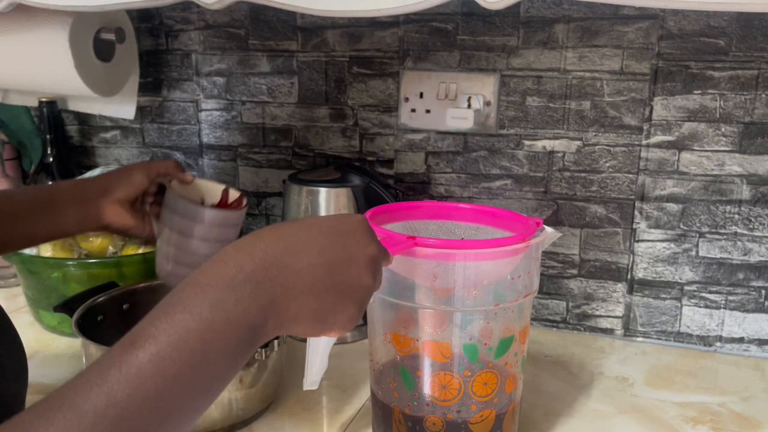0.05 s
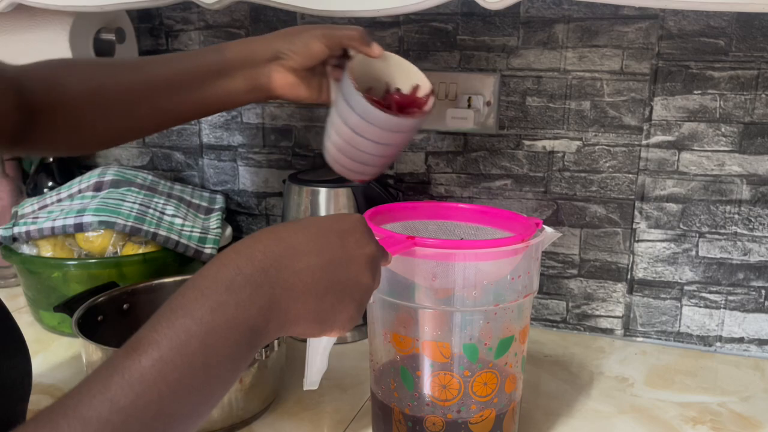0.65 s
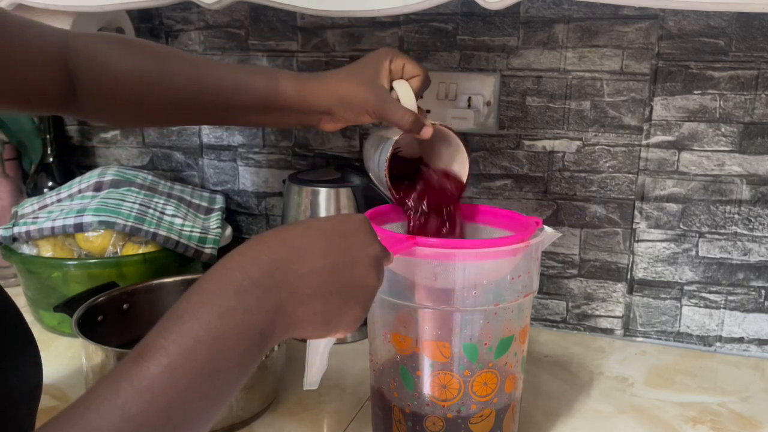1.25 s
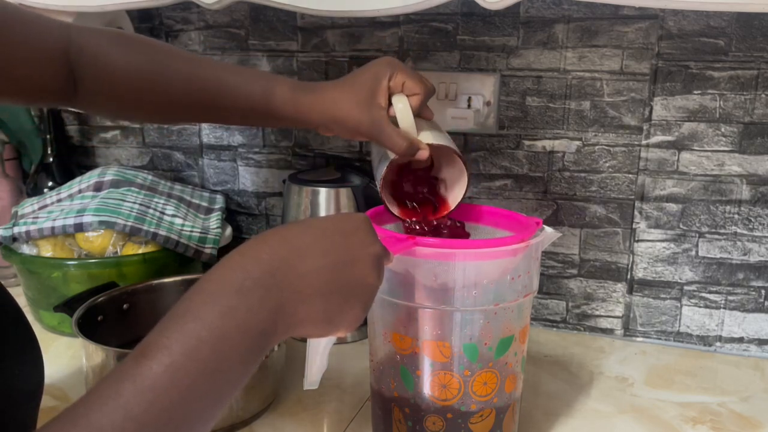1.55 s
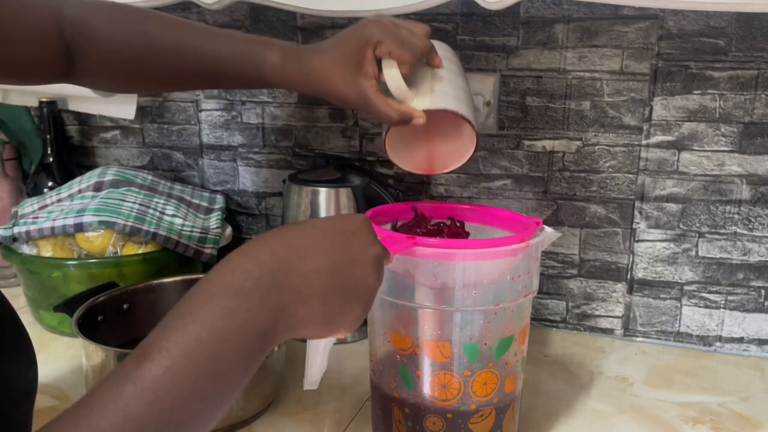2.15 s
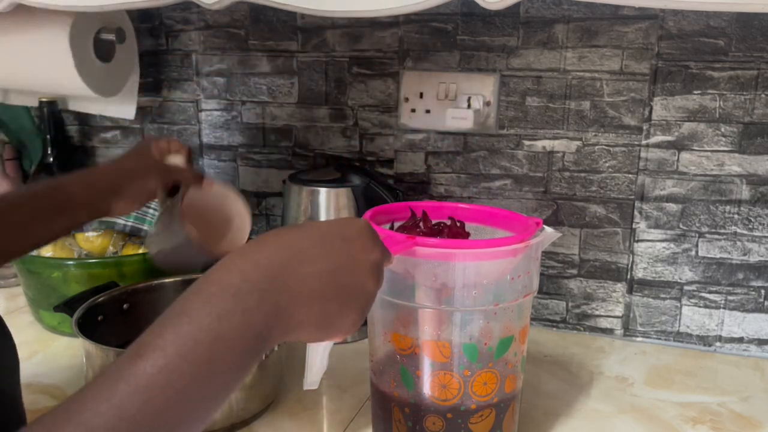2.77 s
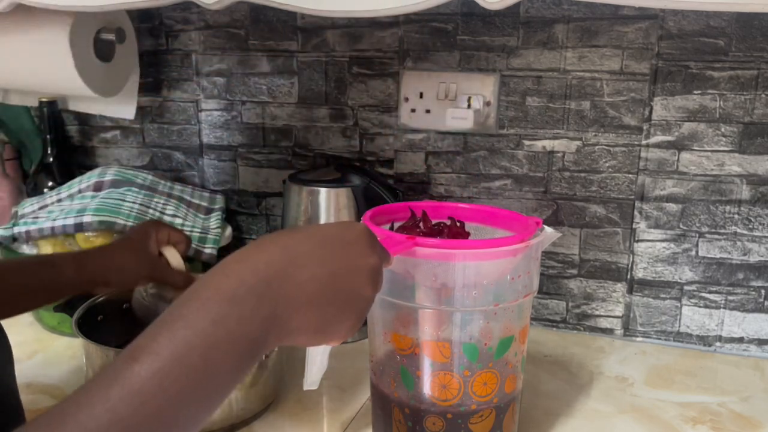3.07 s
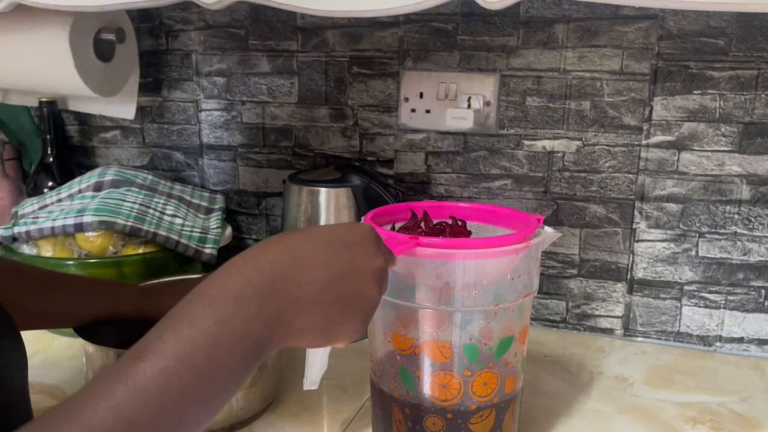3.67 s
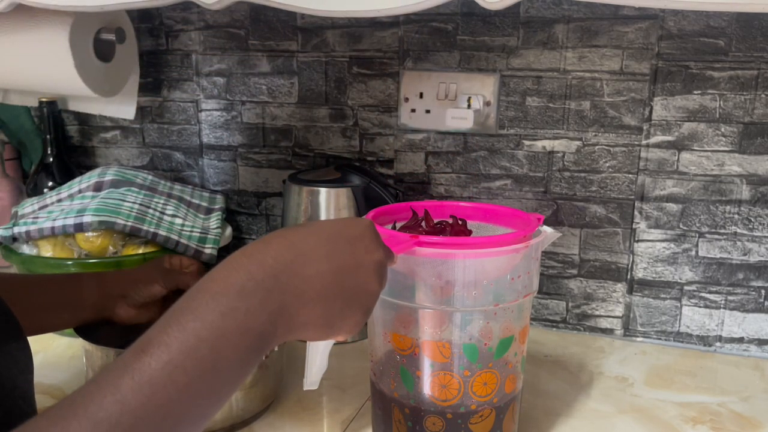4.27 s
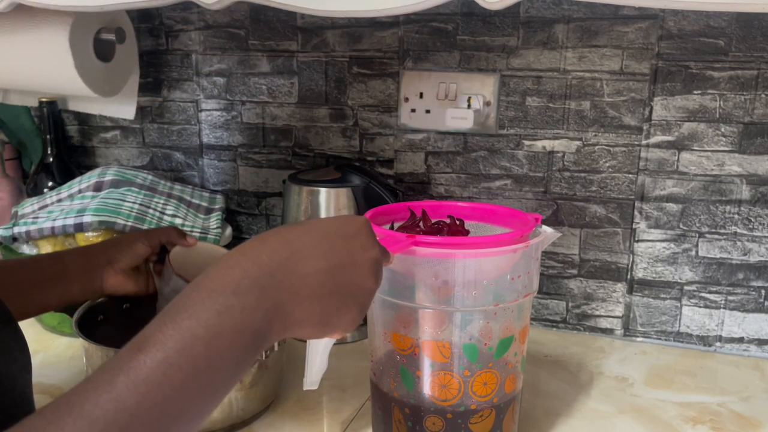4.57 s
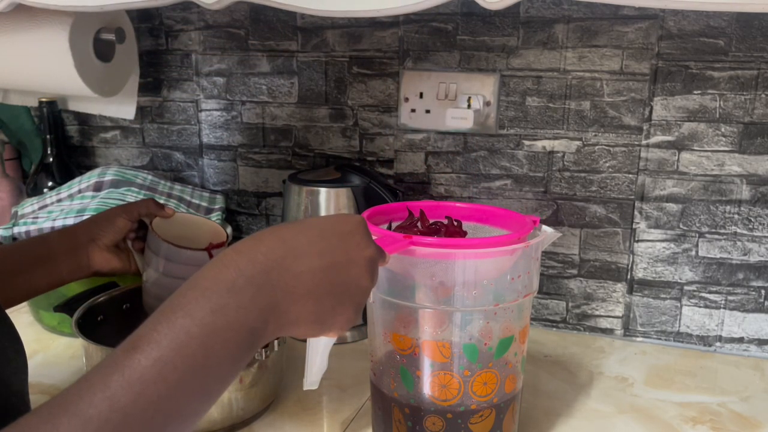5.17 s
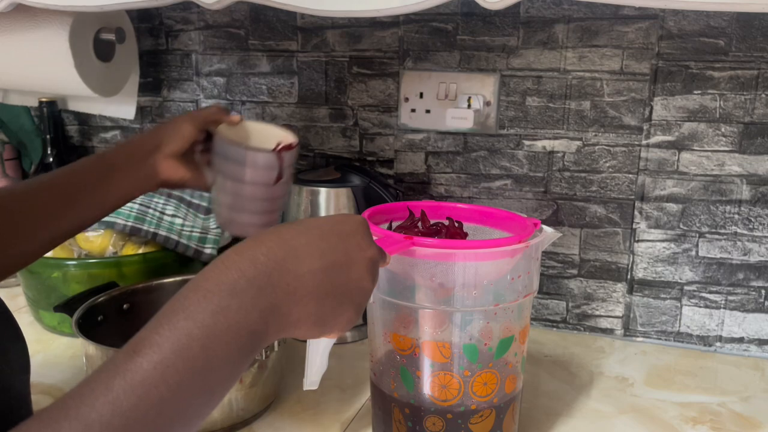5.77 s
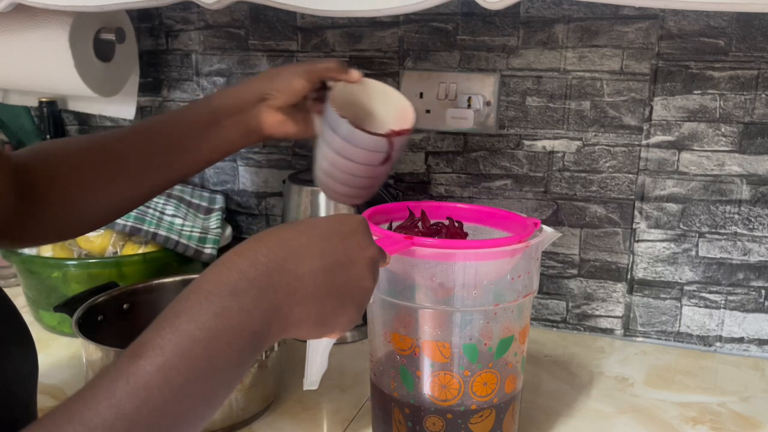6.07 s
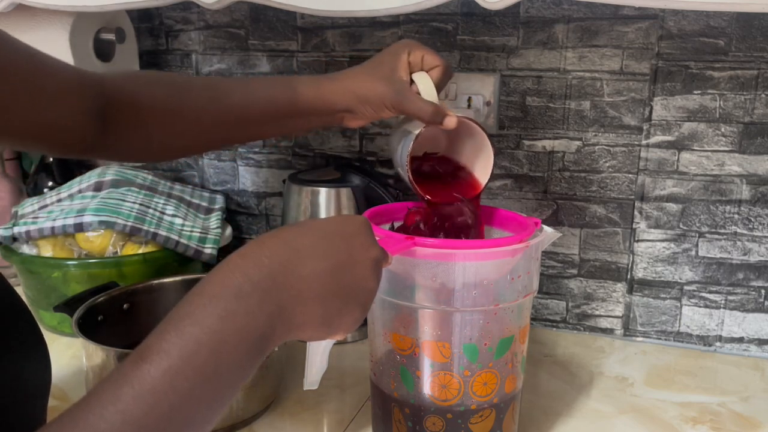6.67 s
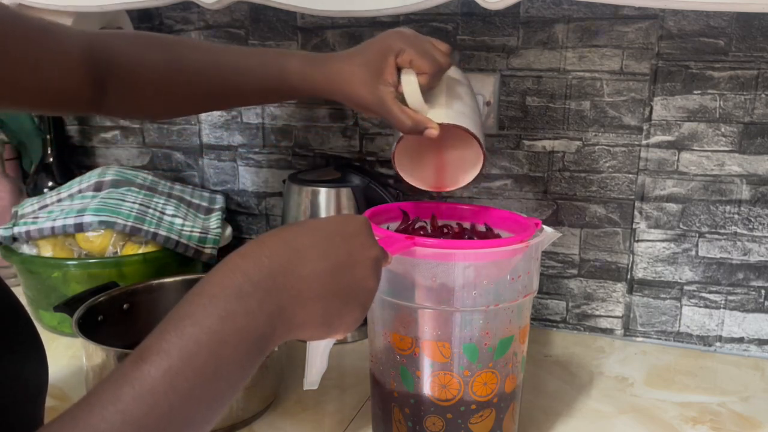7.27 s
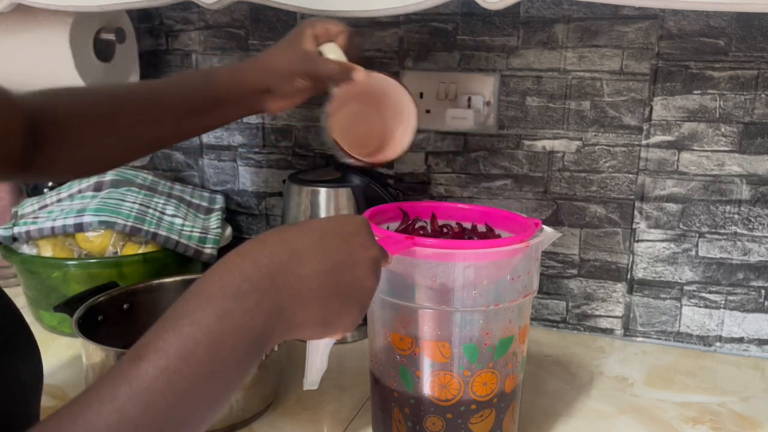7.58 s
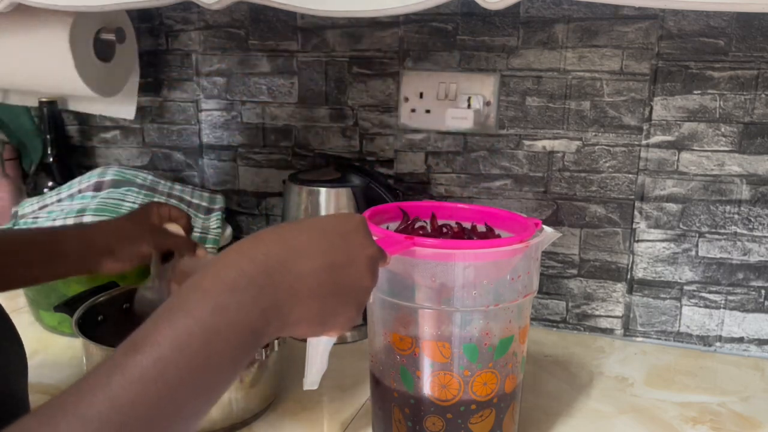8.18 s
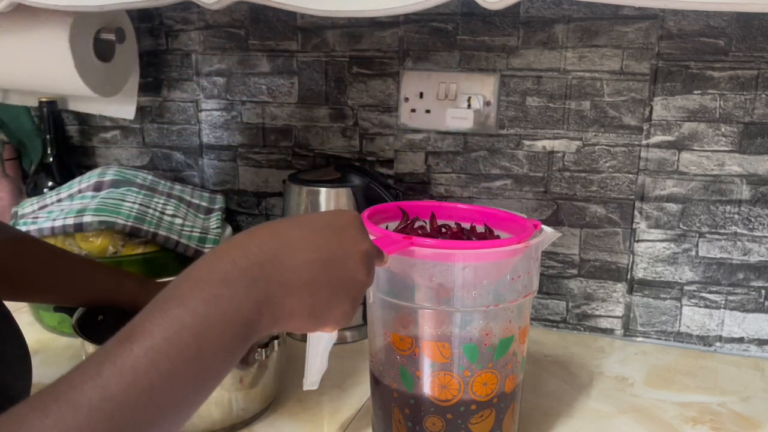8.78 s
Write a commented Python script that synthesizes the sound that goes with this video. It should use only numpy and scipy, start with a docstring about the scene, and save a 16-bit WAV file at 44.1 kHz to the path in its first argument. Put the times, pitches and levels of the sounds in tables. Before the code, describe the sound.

Juice and wet petals pour twice through a strainer into a plastic jug, with a mug knocking in a metal pot between pours.

```python
"""Straining juice in a tiled kitchen.

Two mugs of steeped juice pour through a plastic strainer into a jug. Wet petals plop on the mesh
and wake the air in the jug; the juice splashes, fizzes and bubbles. After each pour the mug knocks
and clatters in the pot as it scoops, and juice drips back off it. A fridge hums behind."""
import sys
import numpy as np
from scipy import signal
from scipy.fft import rfft, irfft, next_fast_len
from scipy.io import wavfile

SR = 44100
rng = np.random.default_rng(int(sys.argv[2]) if len(sys.argv) > 2 else 0)


def output_pcm(signal):
    """Save a mono or channel-first signal as 16-bit PCM at the path in sys.argv[1].

    Samples are clipped to [-1, 1] before scaling.
    """
    pcm = np.clip(np.atleast_2d(signal).T, -1, 1) * 32767
    wavfile.write(sys.argv[1], SR, np.round(pcm).astype(np.int16))


N = 393813
TIME_S = np.arange(N) / SR
RING_S = TIME_S[:SR * 3 // 4]  # time axis of one event

# Levels are ahead of the mix gains; glide is as in bubble().
# fridge, low drone: pitch_hz, level_db
FRIDGE_DRONE = [(42, -71), (49.4, -62), (84, -70), (126, -61.5), (137.5, -66)]
# fridge, faint upper lines: pitch_hz, level_db
FRIDGE_HUM = [(100, -102), (168, -76), (300, -72.5), (336, -74.5), (395.5, -71), (603, -72.5), (1583, -72),
              (3166, -88)]
# fridge hiss: freq_hz, gain_db
HISS_SPECTRUM = [(4000, -9), (7000, -4), (7900, 12.5), (8500, 6), (10000, 8.5), (11000, 9), (12000, -58)]
# room air: freq_hz, gain_db
AIR_SPECTRUM = [(25, -48), (50, -2), (100, -8), (170, -4.5), (330, -8), (700, -8.5), (1050, -14),
                (1600, -12), (2100, -18.5), (3000, -26.5), (4000, -32), (5000, -31), (7000, -28.5),
                (12000, -56)]

# surges through the strainer: start_s, rise_s, hold_s, drain_db_per_s, splash_db, fizz_db
SURGES = [(0.857, 0.23, 0.78, 29, -54.5, -54), (1.13, 0.17, 0.045, 179, -47, -65),
          (1.598, .12, 0.086, 130, -72, -93), (6.395, 0.03, 0.021, 13.5, -61, -63),
          (6.586, 0.13, 0.5, 50, -49.5, -53), (7.199, 0.038, 0.51, 23, -61, -69.5)]
# splash in the jug: freq_hz, gain_db
SPLASH_SPECTRUM = [(100, -20), (340, 2.5), (430, 20), (515, 5.5), (595, 1), (680, 2.5), (790, 8.5),
                   (1000, 3), (1350, 6), (2400, 1.5), (4000, -3), (6000, -31), (12000, -41)]
# fizz of the mesh: freq_hz, gain_db
FIZZ_SPECTRUM = [(1500, 7), (3500, 1.5), (5500, 3), (7300, 0.5), (9000, 4.5), (10200, 4), (11300, 7),
                 (13000, -20)]
# drops bursting on rim and mesh: start_s, level_db, centre_hz, body_db
SPATTER_HITS = [(0.935, -36.5, 3800, -9), (1.2084, -42, 2300, -8), (1.412, -35, 5440, -12),
                (1.687, -49, 5230, -6), (1.8972, -38.5, 5160, -9), (2.112, -36, 6300, -29),
                (4.349, -49, 4900, 5), (4.6056, -50, 1900, -6), (5.027, -46, 9000, -37),
                (5.13, -55, 10000, -22), (5.157, -54, 10500, -29), (6.752, -33.5, 9250, -13),
                (7.5397, -44, 4340, 0), (7.8538, -46, 9000, -11)]
# big lumps landing in the strainer: start_s, level_db, pitch_hz, slap_db, t60_s, upper_modes_db
BIG_LUMPS = [(0.937, -34.5, 441, 4, 0.089, -12), (1.008, -34.5, 452, 0.5, 0.058, -15),
             (1.107, -33, 451, -4, 0.045, 1.5), (1.164, -33.5, 466, -12, 0.04, -5),
             (1.293, -42, 435, -4, 0.025, -10), (1.358, -24.5, 432, -8.5, 0.058, -6.5),
             (1.417, -34, 417, -12, 0.047, -6), (1.543, -39.5, 404, -4, 0.1, -10),
             (1.589, -34.5, 412, -9, 0.052, -20), (1.636, -31, 435, -7, 0.053, -6.5),
             (1.686, -32, 466, -11, 0.047, -14), (1.784, -39.5, 427, -2, 0.054, -13),
             (1.858, -39.5, 444, -6.5, 0.046, -8), (1.898, -38.5, 440, -20, 0.052, -4),
             (1.933, -42.5, 445, -22, 0.055, -8), (1.976, -42.5, 440, -18, 0.06, -16),
             (2.109, -45, 466, 1.5, 0.037, -1), (2.161, -31.5, 454, -14, 0.04, -3.5),
             (6.587, -43, 448, -11, 0.056, -11), (6.751, -48, 470, -2, .04, -8),
             (6.786, -48.5, 500, 7, 0.03, -3), (6.856, -27, 455, -10.5, 0.046, -10),
             (6.917, -30.5, 430, -17, 0.065, -14), (6.973, -40, 464, -22, 0.04, -10),
             (7.005, -38, 430, -23, 0.07, -14), (7.072, -29, 434, -12.5, 0.063, -2.5),
             (7.118, -37, 422, -10, 0.055, -13), (7.158, -42, 430, -10, 0.046, -11),
             (7.197, -31.5, 437, -14, 0.059, -2.5), (7.258, -46.5, 430, -13, 0.07, 9),
             (7.295, -37, 453, -10, 0.039, -3), (7.32, -40, 427, -8, 0.062, -3),
             (7.365, -55, 458, -14, 0.09, 15), (7.402, -48.5, 443, -3, 0.044, 9),
             (7.44, -47.5, 441, -17, 0.11, 0), (7.627, -42.5, 430, -1.5, 0.037, 3),
             (7.663, -42, 445, -16, 0.059, -3), (7.715, -48, 450, -6, .05, 4),
             (7.828, -48, 438, -14, 0.12, -8), (7.912, -40, 450, -7.5, 0.066, -2)]
# wet slap of a lump: freq_hz, gain_db
SLAP_SPECTRUM = [(100, -0.5), (300, 3), (750, -3), (1000, 0), (1500, 0.5), (2500, -5.5), (5000, -21),
                 (11000, -65)]
# upper modes of the air in the jug: pitch_hz, level_db, t60_s
JUG_UPPER_MODES = [(590, -2.5, 0.04), (763, -14, 0.052)]
# full strainer thumping the jug: start_s, level_db
STRAINER_THUMPS = [(0.943, -40), (.972, -46)]
# jug wall: pitch_hz, level_db, t60_s
JUG_WALL_MODES = [(68.4, -6.5, 0.21), (128, -1, 0.075), (178, -2.5, 0.099), (282, -1, 0.061),
                  (334, -10, 0.13)]
# largest bubbles in the jug: start_s, level_db, pitch_hz, glide
BIG_BUBBLES = [(1.146, -33, 2450, 0.083), (1.166, -33, 2750, 0.14), (1.2075, -21.5, 2390, .01),
               (1.211, -31, 1840, 0.041), (1.284, -29, 2350, .02), (1.315, -26.5, 2280, 0.027),
               (1.321, -27.5, 3220, .01), (1.336, -29, 2100, 0.023), (1.341, -29, 1214, 0.039),
               (1.349, -35.5, 957, 0.03), (1.36, -25.5, 1320, 0.007), (1.361, -28, 1720, 0.022),
               (1.506, -31.5, 3140, 0.056), (1.753, -31.5, 3200, 0.032), (1.853, -32, 2600, 0.018),
               (1.86, -33.5, 818, 0.0083), (1.874, -40, 2330, 0.022), (1.898, -34, 3250, .02),
               (1.97, -35, 3300, .04), (2.104, -39, 3460, 0.016), (2.162, -32.5, 853, 0.019),
               (2.168, -42, 2080, 0.022), (6.589, -34, 873, .1), (6.602, -40, 4180, 0.0092),
               (6.608, -32.5, 1110, 0.036), (6.75, -31, 2220, .02), (6.766, -31, 2494, 0.018),
               (6.85, -33.5, 830, .01), (6.884, -34.5, 705, 0.018), (6.89, -28, 1490, 0.038),
               (6.901, -30, 3250, 0.026), (6.948, -29.5, 1890, 0.077), (7.007, -34, 737, .01),
               (7.101, -33, 1570, .02), (7.12, -34, 2150, 0.02), (7.226, -33, 2800, .03),
               (7.294, -35, 2250, .02), (7.297, -33, 3300, 0.032), (7.42, -38, 3080, 0.036),
               (7.494, -43.5, 3487, 0.032), (7.568, -34, 2066, 0.022), (7.625, -38, 1150, .03),
               (7.747, -43, 2630, 0.028), (7.835, -39, 3000, .02)]

# juice running off the mug: start_s, length_s, level_db
RUNOFF_SWELLS = [(2.263, 0.96, -56), (3.23, 1.3, -53.5), (5.043, 0.33, -58.5)]
# trickle over the mug: freq_hz, gain_db
TRICKLE_SPECTRUM = [(1400, 3.5), (3000, -1), (7000, -11)]
# largest drops falling into the pot: start_s, level_db, pitch_hz, glide
BIG_DRIPS = [(2.4952, -48.5, 3030, 0.0079), (2.714, -86, 4290, .02), (2.791, -49, 1880, 0.01),
             (2.932, -59, 2900, 0.043), (3.2944, -48, 2900, 0.025), (3.346, -57, 4370, .02),
             (3.361, -53, 2730, .02), (3.487, -46.5, 6850, 0.024), (4.0521, -48.5, 4260, 0.02),
             (4.12, -53, 2030, 0.019), (4.155, -52, 1860, 0.023), (4.213, -52.5, 4700, 0.016),
             (4.232, -51, 3400, 0.017), (4.351, -57, 2880, .02), (4.351, -51, 5500, 0.013),
             (4.466, -36.5, 3395, 0.015), (4.53, -49, 5800, 0.018), (4.6049, -49, 1896, 0.015),
             (4.606, -49.5, 5000, 0.036), (4.6578, -47.5, 6470, 0.022), (4.672, -45, 5900, 0.017),
             (4.7775, -51.5, 3020, 0.015), (5.16, -60, 2960, 0.009), (5.245, -52, 2850, .01),
             (8.124, -50, 3310, 0.032)]
# hollow of the pot: freq_hz, gain_db
HOLLOW_SPECTRUM = [(1200, -30), (1950, 6), (2400, -15), (3000, 4), (3600, -13), (4500, -17), (6200, -8),
                   (9000, -18)]

# mug rattling in the pot: start_s, level_db, body_t60_s, hardness_db
MUG_CLATTERS = [(3.25, -50, 0.13, -28), (3.645, -23.5, 0.19, -4), (3.7225, -30.5, 0.15, 4.5),
                (3.884, -50, 0.36, 6), (8.497, -28, 0.15, 2), (8.544, -28.5, 0.078, -3),
                (8.727, -30, 0.15, 0.5), (8.751, -24.5, 0.2, -6.5), (8.826, -46, 1, 1.5)]
# dull body of the rattle: freq_hz, gain_db
RATTLE_BODY_SPECTRUM = [(50, -26), (80, -10), (110, -6), (180, -2.5), (300, -5), (450, 0), (650, -7),
                        (800, -8), (1050, -15), (1350, -17.5), (1750, -10), (2600, -20.5), (6000, -60)]
# bright edge of the rattle: freq_hz, gain_db
RATTLE_EDGE_SPECTRUM = [(700, -21), (1700, -40), (2700, -1), (3300, 8), (4300, 4), (6500, 1), (9000, -5),
                        (11000, -0.5), (12500, -25)]
# thin pot wall: pitch_hz, level_db, t60_s
POT_WALL_MODES = [(516, -21, 0.15), (582, -1, 0.16), (910, -25, 0.26), (1250, -29, 0.94), (1686, -28, 0.75),
                  (1868, -27, 0.56), (2056, -30, .7), (2250, -7, 0.085), (2440, -26, 0.18),
                  (2810, -28, 0.48), (3050, -9.5, 0.18), (3190, -18, 0.35), (3340, -19, 0.16),
                  (3435, -29, 0.16), (3620, -29, 0.22), (4100, -18, 0.23), (4750, -27, .25)]
# mug foot striking the pot floor: start_s, level_db, pitch_hz, overtones_db
MUG_KNOCKS = [(3.253, -40.5, 473, -31), (3.6462, -5.5, 567, -7), (8.75, -4, 519.4, -2.5),
              (3.728, -20.5, 572, -16), (3.747, -22, 591, -25), (8.774, -24, 500, -6),
              (8.795, -33, 538, 11), (8.826, -31, 542, 5)]
# pot and counter ringing together: pitch_hz, level_db, t60_s
POT_ON_COUNTER_MODES = [(104, -20, 0.15), (175, -20.5, 0.092), (317.6, -14.5, 0.16), (424, -14, 0.041),
                        (476, -2, 0.042), (960, -2.5, 0.026), (1044, -2.5, 0.041), (1802, -14.5, 0.098),
                        (1880, -19, 0.068), (2130, -13, 0.036), (2380, -17.5, 0.046), (4130, -8, 0.014),
                        (4355, -16, 0.025), (5210, -13, 0.027)]
# pot rocking back on the counter: start_s, level_db
POT_THUDS = [(3.732, -27.5), (3.886, -37), (8.501, -31), (8.544, -30)]
# counter: pitch_hz, level_db, t60_s
THUD_MODES = [(151, -3, 0.14), (188, -3.5, 0.21), (231, 2, 0.064), (315, -3, 0.14), (416, -0.5, 0.086)]
# mug sliding down the pot: start_s, length_s, level_db, pitch_hz
MUG_SLIDES = [(3.35, .11, -55, 1245), (3.49, .18, -55, 1378)]
# glaze striking steel: start_s, level_db
GLAZE_TICKS = [(3.646, -47), (3.724, -25), (3.7275, -28), (3.741, -24), (8.501, -48), (8.75, -29)]
# tick of the glaze: freq_hz, gain_db
TICK_SPECTRUM = [(1500, -30), (3300, 15), (6000, -11), (9000, 0), (12500, 9), (16000, -14)]

# kitchen reverberation: freq_hz, t60_s
KITCHEN_DECAY = [(100, 1), (300, 0.4), (700, 0.69), (2000, 0.56), (5000, 0.42), (11000, 0.4)]
# diffuse sound at the two microphone ports: freq_hz, coherence
PORT_COHERENCE = [(60, 0.8), (250, 0.6), (500, 0.37), (600, 0), (5000, 0), (6500, 0.3), (8000, 0),
                  (8400, 1), (12000, 1)]
# phase between the ports: freq_hz, left_lead_rad
PORT_LEAD = [(1800, 0), (3300, .7), (6500, .4), (7000, 2.8), (8500, 0), (9400, -1.7), (10150, -3.14),
             (11000, -4.5), (11800, -6.2)]
# level between the ports: freq_hz, left_minus_right_db
PORT_BALANCE = [(60, 1.2), (300, 1.7), (1000, 1.9), (3000, 1.3), (5300, 4.8), (6800, 3.1), (7700, 1.6),
                (10000, 0.17)]
# microphone response: freq_hz, gain_db
MIC_RESPONSE = [(18, -30), (44, 0.5), (70, 0), (11000, -1.5), (12300, -7), (13300, -46), (14500, -26),
                (16000, -40)]

AIR_DB, HISS_DB, COMPRESSOR_HZ = -57, -67.5, 42
FIZZ_EXPONENT = 1.47  # fizz grows as this power of the flow
DRY_SHARE = .11  # no stray events below this share of peak flow
SMALL_GLIDE = .035
POT_LEAD_S, BAND_LIMIT_HZ = .00012, 16800


def amp(db):
    """Decibels to gain."""
    return 10 ** (np.asarray(db) / 20)


def unit_rms(x):
    """Scale to rms 1."""
    return x / np.sqrt(np.mean(x ** 2) + 1e-20)


def lookup(points, hz):
    """Interpolate a table on a log-frequency axis."""
    freq_hz, value = np.transpose(points)
    return np.interp(np.log(hz + 1), np.log(freq_hz + 1), value)


def add(mix, start_s, sound):
    """Mix a sound in at start_s."""
    part = mix[..., round(start_s * SR):][..., :sound.shape[-1]]
    part += sound[..., :part.shape[-1]]


def colour(x, spectrum, size=4096):
    """Minimum-phase filter from (freq_hz, gain_db) points."""
    log_gain = np.log(amp(lookup(spectrum, abs(np.fft.fftfreq(size, 1 / SR)))))
    taps = np.fft.ifft(np.exp(np.conj(signal.hilbert(log_gain)))).real[:size // 2]
    return np.apply_along_axis(lambda row: signal.oaconvolve(row, taps)[:len(row)], -1, x)


def decay(t60_s):
    """Fall of 60 dB in t60_s."""
    return np.exp(-np.log(1000) * RING_S / t60_s)


def attack(rise_s):
    """Soft onset of about rise_s."""
    return 1 - np.exp(-(RING_S / rise_s) ** 2)


def arch(start_s, length_s):
    """Semicircular swell and ebb."""
    return np.sqrt(np.maximum(1 - (2 * (TIME_S - start_s) / length_s - 1) ** 2, 0))


def wander(rate_hz, count=24):
    """Random drift below rate_hz, rms 1."""
    coarse_s = TIME_S[::128]
    share, phase = rng.random((2, count, 1))
    drift = np.sin(2 * np.pi * (rate_hz * share * coarse_s + phase)).sum(0)
    return np.interp(TIME_S, coarse_s, unit_rms(drift))


def ring(modes, rise_cycles):
    """Struck modes, each building up over rise_cycles."""
    return sum(amp(db) * decay(t60_s) * attack(rise_cycles / hz)
               * np.sin(2 * np.pi * (hz * RING_S + rng.random())) for hz, db, t60_s in modes)


def burst(spectrum, t60_s, rise_s):
    """Decaying puff of coloured noise."""
    return unit_rms(colour(rng.standard_normal(len(RING_S)), spectrum)) * decay(t60_s) * attack(rise_s)


def diffuse(pair):
    """Blend two unrelated channels to the coherence of diffuse sound at the ports."""
    a, b = rfft(pair)
    coherence = np.clip(lookup(PORT_COHERENCE, np.fft.rfftfreq(pair.shape[1], 1 / SR)), 0, 1)
    mid, side = np.sqrt((1 + coherence) / 2) * a, np.sqrt((1 - coherence) / 2) * b
    return irfft([mid + side, mid - side], pair.shape[1])


def fridge():
    """Wavering hum and a hiss pulsing with the compressor, over steady room air."""
    air = amp(AIR_DB) * unit_rms(colour(diffuse(rng.standard_normal((2, N))), AIR_SPECTRUM))
    hum = np.zeros(N)
    for hz, db in FRIDGE_DRONE + FRIDGE_HUM:
        gain = amp(db) * np.sqrt(2) * (1 + .042 * wander(5.9))
        hum += gain * np.sin(2 * np.pi * hz * TIME_S + hz * .00026 * wander(5.2))
    stroke = np.exp(.25 * np.cos(2 * np.pi * COMPRESSOR_HZ * TIME_S))
    hiss = colour(diffuse(rng.standard_normal((2, N))), HISS_SPECTRUM)
    return air + hum + amp(HISS_DB) * unit_rms(stroke * hiss)


def surges():
    """Splash and fizz gains: flow grows as the mug tips, holds, then drains through the petals."""
    splash_gain, fizz_gain = np.zeros((2, N))
    for start_s, rise_s, hold_s, drain_db_per_s, splash_db, fizz_db in SURGES:
        age_s = TIME_S - start_s
        draining_s = np.maximum(age_s - rise_s - hold_s, 0)
        flow = np.clip(age_s / rise_s, 0, 1) * amp(-drain_db_per_s * draining_s)
        splash_gain += amp(splash_db) * flow
        fizz_gain += amp(fizz_db) * flow ** FIZZ_EXPONENT
    return splash_gain, fizz_gain


def bubble(hz, cycles, glide):
    """A bubble nearing the surface: every `cycles` it decays by 1/e and rises by 2 * glide * hz."""
    age = np.arange(int(6 * cycles * SR / hz)) * hz / (cycles * SR)
    envelope = np.exp(-age) * (1 - np.exp(-age * cycles / 2))
    return envelope * np.sin(2 * np.pi * cycles * age * (1 + glide * age))


def swarm(low_hz, high_hz, per_s, cycles, glide, spread_db, pitches):
    """Tiny bubbles, most faint and a few strong; rms 1."""
    out = np.zeros(N)
    for hz in np.geomspace(low_hz, high_hz, pitches):
        when, chance, size = rng.random((3, N // 200))
        born = chance < per_s * N / SR / pitches / len(chance)
        level_db = spread_db * np.minimum(-np.log(size[born] + 1e-9), np.pi)
        impulses = np.zeros(N)
        impulses[(when[born] * N).astype(int)] = amp(level_db)
        out += signal.oaconvolve(impulses, bubble(hz, cycles, glide) * hz ** 1.24)[:N]
    return unit_rms(out)


def pour(splash_gain, fizz_gain):
    """Streams from the mesh churn bubbles into the jug while the mesh fizzes."""
    churn = swarm(420, 6000, per_s=1100, cycles=6, glide=.018, spread_db=4, pitches=40)
    spray = swarm(3500, 13000, per_s=2400, cycles=5, glide=.01, spread_db=4.4, pitches=20)
    clumps = amp(2.2 * wander(32))  # the petals break up the stream
    splash = unit_rms(clumps * colour(churn + amp(-3.5) * rng.standard_normal(N), SPLASH_SPECTRUM))
    fizz = unit_rms(clumps * colour(spray + amp(-22) * rng.standard_normal(N), FIZZ_SPECTRUM))
    return amp(-3) * splash_gain * splash + amp(1) * fizz_gain * fizz


def spatters():
    """Drops burst on rim and mesh with a short spit."""
    out = np.zeros(N)
    for start_s, db, hz, body_db in SPATTER_HITS:
        spectrum = [(hz / 6, body_db - 4), (hz / 2, body_db), (hz, 0), (hz * 1.4, -5), (hz * 3, -26)]
        add(out, start_s, amp(db) * burst(spectrum, t60_s=.037, rise_s=.00064))
    return out


def strays(stream, per_s, db, spread_db, low_hz, high_hz, db_per_flow_db):
    """Random (start_s, level_db, pitch_hz) events while a stream runs, fainter as it thins."""
    count = int(per_s * N / SR)
    when, size, pitch = rng.random((count, 3)).T
    start_s = (np.arange(count) + when) / per_s
    share = np.interp(start_s, TIME_S, stream) / stream.max()
    level_db = db + db_per_flow_db * 20 * np.log10(share + 1e-9) + spread_db * (2 * size - 1)
    pitch_hz = low_hz * (high_hz / low_hz) ** pitch
    return np.transpose([start_s, level_db, pitch_hz])[share > DRY_SHARE]


def plops(stream):
    """Lumps slap the wet heap and wake the air in the jug, whose note lifts as they sink."""
    out = np.zeros(N)
    small = strays(stream, per_s=7, db=-45, spread_db=10.5, low_hz=350, high_hz=565, db_per_flow_db=.5)
    small_slap_db, small_t60_s, small_upper_db = -21, .045, 1
    lumps = list(BIG_LUMPS) + [(*row, small_slap_db, small_t60_s, small_upper_db) for row in small]
    for start_s, db, hz, slap_db, t60_s, upper_db in lumps:
        bend, detune = rng.uniform((0, .95), (.09, 1.05))
        note_hz = hz * (1 + bend * (.5 - decay(t60_s)))
        air = decay(t60_s) * attack(.004) * np.sin(2 * np.pi * np.cumsum(note_hz) / SR)
        modes = [(mode_hz * detune, *rest) for mode_hz, *rest in JUG_UPPER_MODES]
        upper = amp(upper_db) * ring(modes, rise_cycles=1.54)
        slap = amp(slap_db - 10) * burst(SLAP_SPECTRUM, t60_s=.17, rise_s=.00048)
        add(out, start_s - .001, amp(db + 5.5) * (air + upper + slap))
    return out


def thumps():
    """The full strainer thumps the jug wall."""
    out = np.zeros(N)
    for start_s, db in STRAINER_THUMPS:
        add(out, start_s, amp(db + 8) * ring(JUG_WALL_MODES, rise_cycles=.56))
    return out


def plinks(big, small, cycles, splash_db):
    """Each bubble chirps upward inside its own small splash."""
    out = np.zeros(N)
    for start_s, db, hz, glide in list(big) + [(*row, SMALL_GLIDE) for row in small]:
        spectrum = [(hz / 3, -36), (hz / 1.28, -15), (hz * 1.02, 0), (hz * 1.2, -16), (hz * 1.8, -40)]
        add(out, start_s, amp(db) * bubble(hz, cycles, glide))
        add(out, start_s, amp(db + splash_db) * burst(spectrum, t60_s=.055, rise_s=.003))
    return out


def jug_bubbles(stream):
    """Large bubbles chirp in the jug; smaller ones follow the flow."""
    small = strays(stream, per_s=5, db=-41, spread_db=4, low_hz=1400, high_hz=4000, db_per_flow_db=.45)
    return plinks(BIG_BUBBLES, small, cycles=8, splash_db=-3)


def runoff():
    """Juice trickles over the mug; drops fall back and ring in the hollow of the pot."""
    stream = sum(amp(db) * arch(start_s, length_s) for start_s, length_s, db in RUNOFF_SWELLS)
    trickle = swarm(1400, 7000, per_s=1500, cycles=22, glide=.006, spread_db=1.5, pitches=30)
    trickle = unit_rms(colour(trickle, TRICKLE_SPECTRUM))
    small = strays(stream, per_s=4, db=-57, spread_db=3, low_hz=2400, high_hz=4590, db_per_flow_db=.9)
    drops = plinks(BIG_DRIPS, small, cycles=12, splash_db=-6)
    hollow = burst(HOLLOW_SPECTRUM, t60_s=.16, rise_s=.004)
    drops += amp(-12) * signal.oaconvolve(drops, hollow / np.linalg.norm(hollow))[:N]
    return amp(2) * drops + amp(-11.5) * stream * trickle


def clatters():
    """The mug chatters on metal; harder contact is brighter and rings the pot more."""
    out = np.zeros(N)
    for start_s, db, t60_s, hardness_db in MUG_CLATTERS:
        body = burst(RATTLE_BODY_SPECTRUM, t60_s, rise_s=.0029)
        edge = burst(RATTLE_EDGE_SPECTRUM, t60_s * .78, rise_s=.00015)
        wall = ring(POT_WALL_MODES, rise_cycles=.98)
        add(out, start_s, amp(db) * (body + amp(hardness_db - 4.5) * (edge + wall)))
    return out


def knocks():
    """The pot's loaded floor booms under the mug; pot and counter ring, and thud as the pot rocks."""
    booms, rings = np.zeros((2, N))
    for start_s, db, hz, overtones_db in MUG_KNOCKS:
        boom = decay(t60_s=.063) * attack(rise_s=.0048) * np.sin(2 * np.pi * hz * RING_S)
        add(booms, start_s, amp(db + 2.5) * boom)
        add(rings, start_s, amp(db + overtones_db) * ring(POT_ON_COUNTER_MODES, rise_cycles=2.23))
    for start_s, db in POT_THUDS:
        add(rings, start_s, amp(db) * ring(THUD_MODES, rise_cycles=1.2))
    return booms, rings


def slide():
    """The mug wall sings a thin, broken note as it rubs down the pot."""
    waver_hz, grip = 70 * wander(160), abs(wander(45))
    return grip * sum(amp(db) * arch(start_s, length_s) * np.sin(2 * np.pi * np.cumsum(hz + waver_hz) / SR)
                      for start_s, length_s, db, hz in MUG_SLIDES)


def ticks():
    """Glaze meets steel with a dry, bright tick."""
    out = np.zeros(N)
    for start_s, db in GLAZE_TICKS:
        add(out, start_s, amp(db) * burst(TICK_SPECTRUM, t60_s=.028, rise_s=.0002))
    return out


def echoes(band_t60s, rise_s):
    """Dense stereo echoes of unit energy; each band decays at its own rate."""
    hz, age_s, bands = signal.stft(rng.standard_normal((2, len(RING_S))), SR, nperseg=256)
    bands *= np.exp(-np.log(1000) * age_s / lookup(band_t60s, hz)[:, None])
    tail = signal.istft(bands, SR, nperseg=256)[1][:, :len(RING_S)]
    fade_out = attack(.1)[::-1]
    return unit_rms(diffuse(tail) * attack(rise_s) * fade_out) / np.sqrt(len(RING_S))


def kitchen(x, near_db, room_db):
    """Direct sound, quick echoes off vessels and tiles, and the room tail."""
    near = amp(near_db) * echoes([(300, .055), (8000, .038)], rise_s=.001)
    room = amp(room_db) * echoes(KITCHEN_DECAY, rise_s=.0097)
    return x + signal.oaconvolve(x[None], near + room, axes=1)[:, :N]


def from_left(pair):
    """Sound from the left reaches the right port later."""
    delay_s = round(POT_LEAD_S * SR) / SR
    return np.array([pair[0], np.interp(TIME_S - delay_s, TIME_S, pair[1])])


def scene():
    """Jug close by, pot further back on the left, fridge behind."""
    stream, fizz_gain = surges()
    background = fridge()
    juice = pour(stream, fizz_gain)
    booms, rings = knocks()
    pot = kitchen(booms, near_db=-22, room_db=-12)
    pot += kitchen(ticks(), near_db=-6, room_db=-7)
    pot += kitchen(rings, near_db=-20, room_db=-8)
    pot += kitchen(amp(-1) * clatters(), near_db=-.5, room_db=-1)
    jug = amp(.5) * kitchen(juice + spatters(), near_db=3, room_db=-3)
    jug += kitchen(plops(stream) + thumps(), near_db=-13, room_db=-7)
    jug += kitchen(amp(-5) * jug_bubbles(stream), near_db=-6, room_db=-4)
    mug = kitchen(runoff() + amp(-2) * slide(), near_db=-6, room_db=-4)
    return background + jug + mug + from_left(pot)


def record(dry):
    """Phase and level between the ports, microphone response, then the band limit."""
    size = next_fast_len(N + SR // 10)
    hz = np.fft.rfftfreq(size, 1 / SR)
    left_gain = np.sqrt(amp(lookup(PORT_BALANCE, hz))) * np.exp(.5j * lookup(PORT_LEAD, hz))
    ports = irfft(rfft(dry, size) * np.array([left_gain, 1 / left_gain]), size)[:, :N]
    lowpass = signal.firwin(511, BAND_LIMIT_HZ, window=("kaiser", 9), fs=SR)
    return signal.oaconvolve(colour(ports, MIC_RESPONSE), lowpass[None], "same")


dry = scene()
out = record(dry)
output_pcm(out)
```